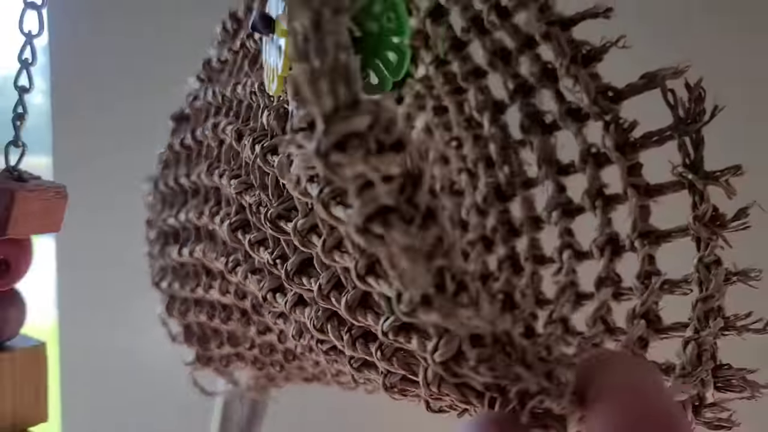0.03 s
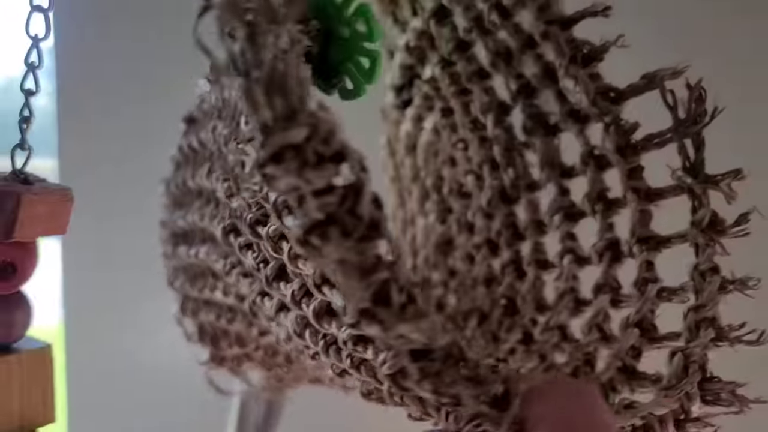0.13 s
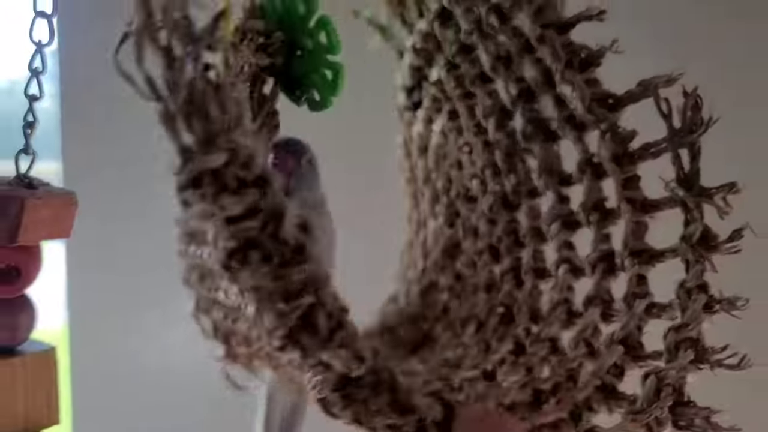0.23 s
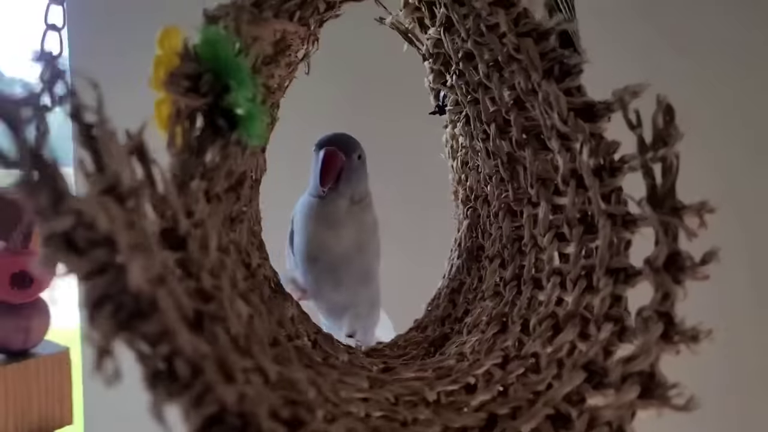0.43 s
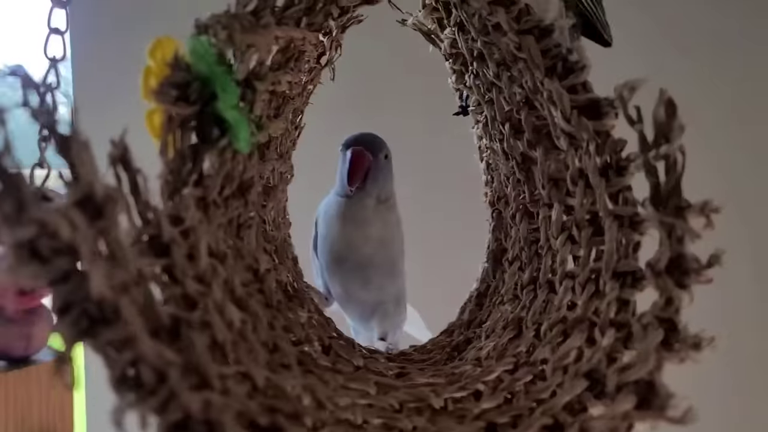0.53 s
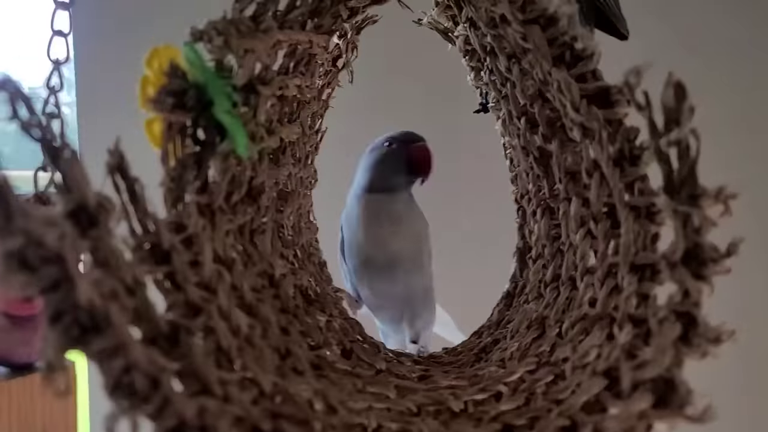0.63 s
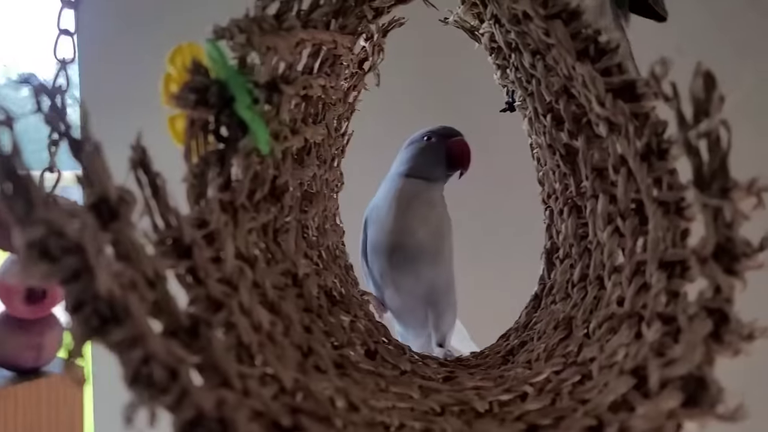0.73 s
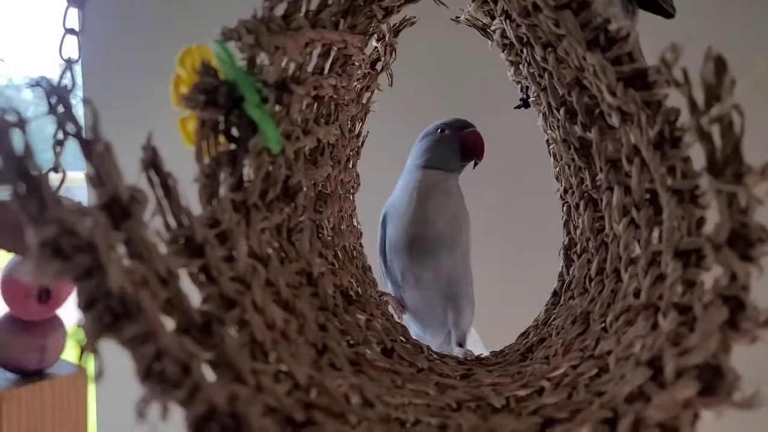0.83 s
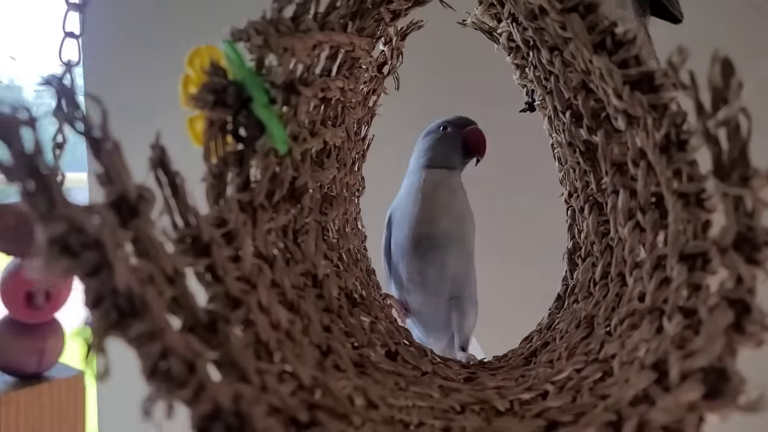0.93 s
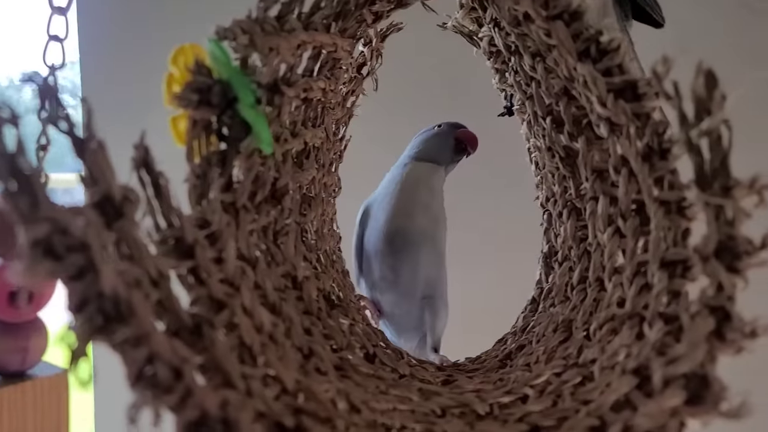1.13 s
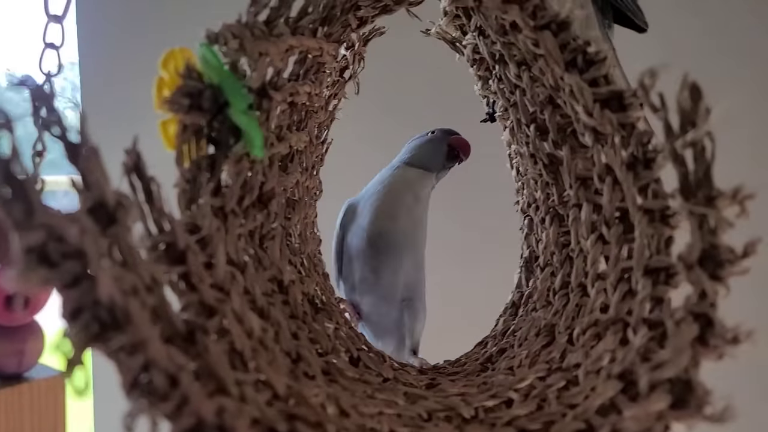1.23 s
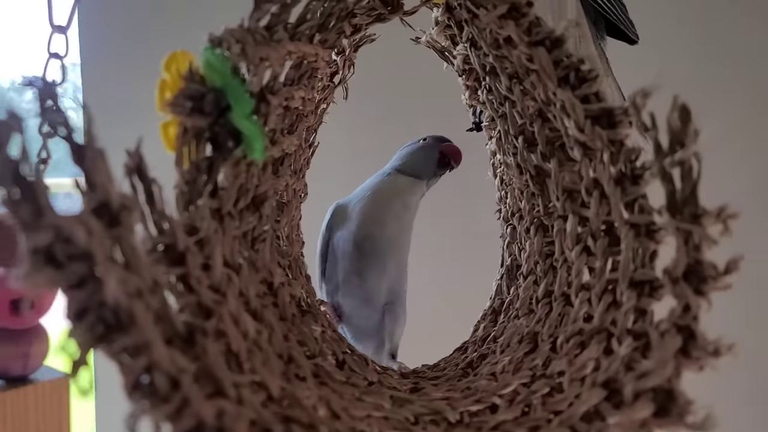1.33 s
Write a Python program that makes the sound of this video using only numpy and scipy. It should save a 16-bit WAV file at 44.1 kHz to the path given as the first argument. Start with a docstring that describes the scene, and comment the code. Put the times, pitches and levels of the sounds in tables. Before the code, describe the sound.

In a bare, echoing room, a parrot squawks once, harsh and buzzing, and follows with a quieter, lower, breathy whine. A woven toy ticks lightly near the microphone, and a faint hum runs underneath.

```python
"""Over a faint steady hum, a parakeet in a bare, ringing room gives one harsh squawk, then a
softer, lower whine. Both are a shaky syrinx tone with a rasp of air, coloured by the throat.
The squawk opens with a chirp, then sags and buzzes; the other side of the syrinx joins the whine.
A few light ticks, likely from a woven toy, fall close to the microphone."""
import sys
import numpy as np
from scipy import signal
from scipy.fft import rfft, irfft, next_fast_len
from scipy.io import wavfile
from scipy.ndimage import uniform_filter1d

SR = 44100
rng = np.random.default_rng(int(sys.argv[2]) if len(sys.argv) > 2 else 0)


def int16_out(signal):
    """Quantize to a 16-bit WAV file."""
    q = np.round(np.clip(np.atleast_2d(signal).T, -1, 1) * 32767)
    wavfile.write(sys.argv[1], SR, q.astype(np.int16))


N = 61739
T = np.arange(N) / SR


def amp(db):
    """Decibels to gain."""
    return 10 ** (np.asarray(db) / 20)


def unit(x):
    """Scales to rms 1."""
    return x / np.sqrt(np.mean(x ** 2) + 1e-20)


def read(points, hz):
    """Reads a curve on a log-frequency axis."""
    f, value = np.transpose(points)
    return np.interp(np.log(hz + 1), np.log(f + 1), value)


def follow(contour, fade_s=.005):
    """Pitch, gain and any further columns at every sample; the gain fades out beyond the contour."""
    times, hz, db, *rest = np.transpose(contour)
    gate = np.clip(np.minimum(T - times[0], times[-1] - T) / fade_s + 1, 0, 1)
    level = gate * amp(np.interp(T, times, db))
    return [np.interp(T, times, hz), level] + [np.interp(T, times, column) for column in rest]


def colour(x, points):
    """Equalises by a curve of (Hz, dB) points."""
    size = next_fast_len(N + 4096)
    gain = amp(read(points, np.fft.rfftfreq(size, 1 / SR)))
    return irfft(rfft(x, size) * gain, size)[..., :N]


def wobble(rate_hz):
    """Random wander of rms 1, rolling off above the given rate."""
    hz = np.fft.rfftfreq(N, 1 / SR)
    return unit(irfft(rfft(rng.standard_normal(N)) / np.sqrt(1 + (hz / rate_hz) ** 4), N))


def appliance_hum(waver_db=1.0, drift_hz=1.5, pan_db=4):
    """An appliance hums in wavering sine tones, the upper ones leaning right."""
    # Each row: frequency in Hz, level in dB.
    partials = [(64, -63), (79.5, -63.5), (149, -66), (296.1, -82), (368, -83.5), (678.3, -87.5)]
    out = np.zeros((2, N))
    for hz, db in partials:
        cycles = np.cumsum(hz + drift_hz * wobble(6.7)) / SR + rng.random()
        pan = pan_db * (hz > 100) * np.array([[-1], [1]])
        out += np.sqrt(2) * amp(db + waver_db * wobble(9.7) + pan) * np.sin(2 * np.pi * cycles)
    return out


def room_air(level_db=-61.5):
    """A soft bed of noise, centred in the bass and wide above it."""
    # The air's colour. Each row: frequency in Hz, gain in dB.
    spectrum = [(15, -16.5), (35, -5), (65, -1), (110, -1), (200, -14.5), (450, -19), (700, -16.5),
                (950, -27.5), (3000, -32), (7000, -34.5), (8300, -43.5), (12000, -42), (14000, -39.5),
                (16000, -52)]
    # Stereo image. Each row: frequency in Hz, left-right likeness from 0 to 1.
    likeness = [(30, 1), (100, 0.65), (250, 0.094), (600, 0), (16000, 0.07)]
    left, independent = rfft(rng.standard_normal((2, N)))
    same = read(likeness, np.fft.rfftfreq(N, 1 / SR))
    right = same * left + np.sqrt(1 - same ** 2) * independent
    return amp(level_db) * unit(colour(irfft(np.array([left, right]), N), spectrum))


def syrinx_phase(hz, jitter, jitter_hz):
    """Phase of a shaky syrinx tone; jitter is the wander as a share of the pitch."""
    return 2 * np.pi * np.cumsum(hz * (1 + jitter * wobble(jitter_hz))) / SR


def chirp(third_db=-1.5):
    """The squawk's hollow attack: just the fundamental and third harmonic."""
    # Each row: time in seconds, pitch in Hz, level in dB.
    contour = [(.212, 1668, -57), (.219, 1723, -46), (.232, 1628, -42), (.246, 1654, -67.5)]
    hz, level = follow(contour)
    phase = syrinx_phase(hz, jitter=.044, jitter_hz=460)
    return level * np.sqrt(2) * (np.sin(phase) + amp(third_db) * np.sin(3 * phase))


def bird_call(contour, throat, rasp_colour, jitter, jitter_hz, flutter_db, flutter_hz, buzz_hz=1064.4):
    """The syrinx makes a harmonic tone and puffs air once a cycle; the throat colours both."""
    hz, level, rasp_db, buzz_depth = follow(contour)
    phase = syrinx_phase(hz, jitter, jitter_hz)
    flutter = unit(amp(flutter_db * wobble(flutter_hz)))
    tone = colour(flutter * sum(np.cos(k * phase) for k in range(1, 11)), throat)
    tone /= np.sqrt(uniform_filter1d(tone ** 2, size=900) + 1e-9)  # evens out slow swells
    # A slower vibration of the syrinx puts buzzing side tones around the harmonics.
    tone *= 1 + buzz_depth * np.cos(syrinx_phase(buzz_hz, jitter=.09, jitter_hz=350))
    puffs = flutter * (1 + np.cos(phase)) * rng.standard_normal(N)
    rasp = unit(colour(puffs, rasp_colour))
    rasp_gain = amp(rasp_db)
    return level * (tone + rasp_gain * rasp) / np.sqrt(1 + rasp_gain ** 2)


def squawk():
    """The harsh call: it starts breathy, clears at its peak and sags into a rasping buzz."""
    # Each row: time in seconds, pitch in Hz, level in dB, rasp against tone in dB, buzz depth 0 to 1.
    contour = [(.208, 1599, -45.5, 3.5, 0.5), (.224, 1624, -40, 5, 0.2), (.236, 1670, -31.5, -2, 0.05),
               (.26, 1715, -32, -9.5, 0.1), (.294, 1700, -24, -25, 0.04), (.312, 1570, -25, -30, 0.03),
               (.33, 1500, -26, -17.5, 0.17), (.35, 1515, -22.5, -12.5, 0.06), (.385, 1519, -34.5, 0, 0.73),
               (.44, 1511, -41.5, 4.5, 0.54), (.49, 1420, -65, -5, 0.45)]
    # Throat colour of the tone, then of the rasp. Each row: frequency in Hz, gain in dB.
    throat = [(900, -62.5), (1600, -44), (2300, -9), (2800, 3), (3100, 2), (3450, 2), (3700, -28),
              (5000, -31), (6300, -18), (6900, -19), (7600, -40.5), (9300, -25), (11000, -42.5),
              (16000, -53.5)]
    rasp_colour = [(400, -45.5), (1050, -34), (1550, -9), (2100, 0), (2450, -0.5), (3050, 4), (3700, 0.5),
                   (4200, 5), (4550, -10.5), (5200, -6), (6600, -12.5), (7500, -15), (9200, -17),
                   (11000, -36), (16000, -41.5)]
    return bird_call(contour, throat, rasp_colour,
                     jitter=.03436, jitter_hz=290, flutter_db=3.5, flutter_hz=175)


def ticks():
    """Light ticks, likely from a woven toy: each a snap of noise and a very short ring."""
    # Each row: start in seconds, level in dB, ring in Hz, decay in seconds, snap against ring in dB.
    hits = [(.457, -31, 5920, 0.00078, 4), (0.623, -47, 12500, .0008, 0), (0.66, -56, 11370, 0.0044, 5),
            (1.185, -60, 7700, 0.00096, -11), (1.2745, -49.5, 4510, 0.00067, -16),
            (1.278, -48, 3235, 0.0021, -29)]
    # The snap's colour. Each row: frequency in Hz, gain in dB.
    snap_colour = [(600, -31), (900, -12), (1300, 3), (6000, 5.5), (9000, -4), (12500, -5.5), (16000, -11)]
    out = np.zeros(N)
    for start, db, ring_hz, decay_s, snap_db in hits:
        age = np.maximum(T - start, 0)
        envelope = (T > start) * amp(db) * np.exp(-age / decay_s)
        snap = amp(snap_db) * unit(colour(rng.standard_normal(N), snap_colour))
        out += envelope * (np.sin(2 * np.pi * ring_hz * age) + snap)
    return out


def whine():
    """The softer, lower call: the syrinx holds a breathy note, then steps down."""
    # Each row: time in seconds, pitch in Hz, level in dB, rasp against tone in dB, buzz depth 0 to 1.
    contour = [(.55, 1339, -46, -8, 0.022), (.595, 1350, -42.5, -13, 0), (.635, 1377, -40, -14.5, 0.0047),
               (.67, 1372, -39.5, -9, 0.0077), (.72, 1372, -42, -6, 0.032), (.755, 1352, -42, -5, 0.0024),
               (.778, 1194, -43.5, -3, 0.0066), (.82, 1200, -40, -10.5, 0.011), (.855, 1191, -38, -13, 0),
               (.875, 1179, -42, -12, 0)]
    # Throat colour of the tone, then of the rasp. Each row: frequency in Hz, gain in dB.
    throat = [(800, -43), (1200, -21), (1400, -18), (1800, -24), (2350, -7.5), (2750, -1), (3150, 3),
              (3570, 4.5), (4100, -14.5), (4750, -13.5), (5600, -25), (6600, -20.5), (7600, -30),
              (8800, -35), (11000, -43.5), (16000, -32)]
    rasp_colour = [(900, -39), (1300, -3.5), (1750, -32.5), (2650, 4.5), (3300, -23), (4050, 3),
                   (4600, -26), (5300, -22), (5750, -16.5), (6500, -4), (7500, -17), (9000, -13),
                   (11000, -38), (16000, -34)]
    return bird_call(contour, throat, rasp_colour,
                     jitter=.025, jitter_hz=251, flutter_db=2, flutter_hz=202)


def second_tone():
    """The other side of the syrinx adds a brief, steadier tone that beats against the whine."""
    # Each row: time in seconds, pitch in Hz, level in dB.
    contour = [(.58, 2740, -67), (.635, 2770, -37), (.66, 2770, -57), (.692, 2985, -46.5),
               (.75, 2960, -45.5), (.772, 2740, -53), (.8, 2720, -42), (.83, 2715, -72)]
    hz, level = follow(contour)
    return level * np.sqrt(2) * np.sin(syrinx_phase(hz, jitter=.01094, jitter_hz=204))


def room(x, direct_db, early_db, tail_db, early_decay_s, reflections_per_s=1500, right_lag_s=.00009):
    """Direct sound reaches the left side first; bare walls add near reflections and a ringing tail."""
    # Reverb time. Each row: frequency in Hz, seconds to fall by 60 dB.
    t60 = [(500, .7), (1400, 0.62), (3000, 0.54), (6000, 0.66), (10000, 0.38), (16000, 0.29)]
    t = np.arange(SR) / SR
    hz, age, bands = signal.stft(rng.standard_normal((2, SR)), SR, nperseg=256)
    decay = amp(-60 * age / read(t60, hz)[:, None])
    tail = signal.istft(bands * decay, SR, nperseg=256)[1][:, :SR]
    tail *= np.minimum(t / .015, 1)
    early = rng.standard_normal((2, SR)) * (rng.random((2, SR)) < reflections_per_s / SR)
    early *= np.exp(-t / early_decay_s) * (t > .001)
    response = (amp(tail_db) * unit(tail) + amp(early_db) * unit(early)) / np.sqrt(SR)
    direct = np.array([x, np.interp(T - right_lag_s, T, x)])
    return amp(direct_db) * direct + signal.fftconvolve(x[None], response, axes=1)[:, :N]


def scene():
    """The bird out in the room and the ticks close by, over air and hum."""
    # A small body radiates little bass. Each row: frequency in Hz, gain in dB.
    small_body = [(950, -13), (1150, 0)]
    # The bird's stereo balance. Each row: frequency in Hz, left minus right in dB.
    balance = [(1000, -2), (2500, -3.5), (4500, -1.5), (8000, 2), (16000, -0.5)]
    bird = colour(chirp() + squawk() + whine() + second_tone(), small_body)
    left, right = room(bird, direct_db=-7.5, early_db=-3, tail_db=-2.5, early_decay_s=.009)
    left = colour(left, np.array(balance) * [1, .5])
    right = colour(right, np.array(balance) * [1, -.5])
    toy = colour(ticks(), small_body)
    close_toy = room(toy, direct_db=-4.5, early_db=-7.5, tail_db=-14, early_decay_s=.0089)
    return np.array([left, right]) + close_toy + room_air() + appliance_hum()


def record(dry):
    """A steep low-pass takes off the very top of the treble."""
    lowpass = signal.firwin(511, cutoff=15750, window=("kaiser", 9), fs=SR)
    return signal.oaconvolve(dry, lowpass[None], "same")


dry = scene()
out = record(dry)
int16_out(out)
```